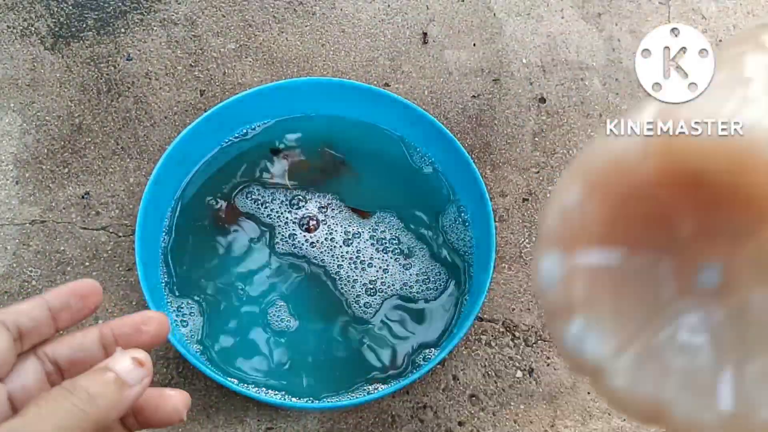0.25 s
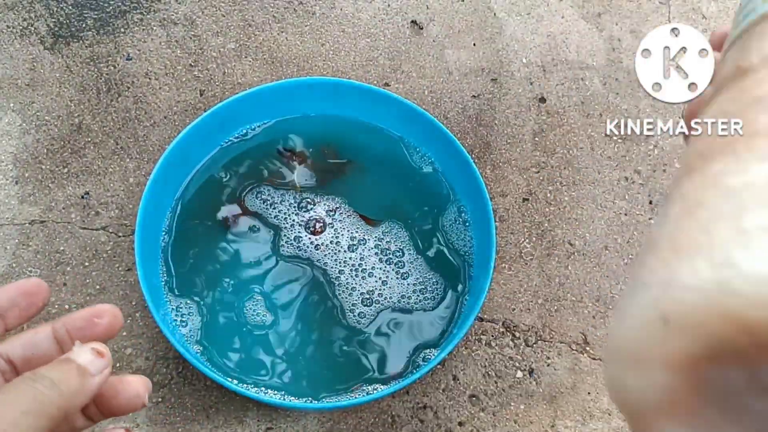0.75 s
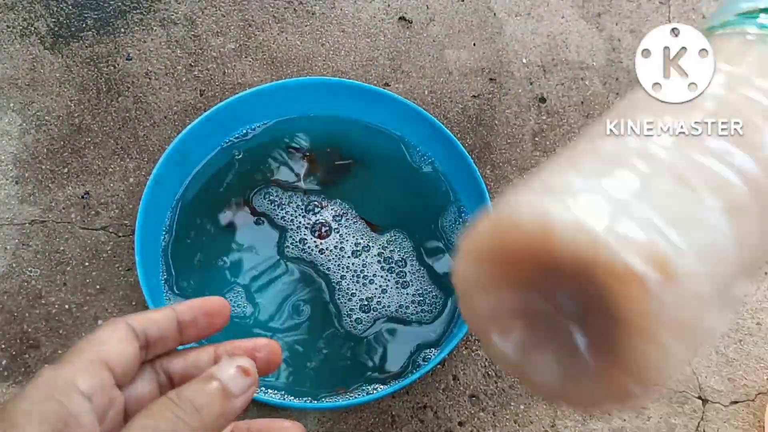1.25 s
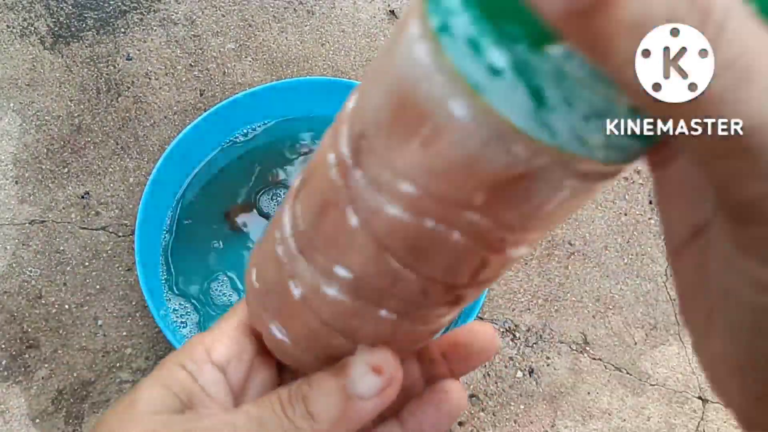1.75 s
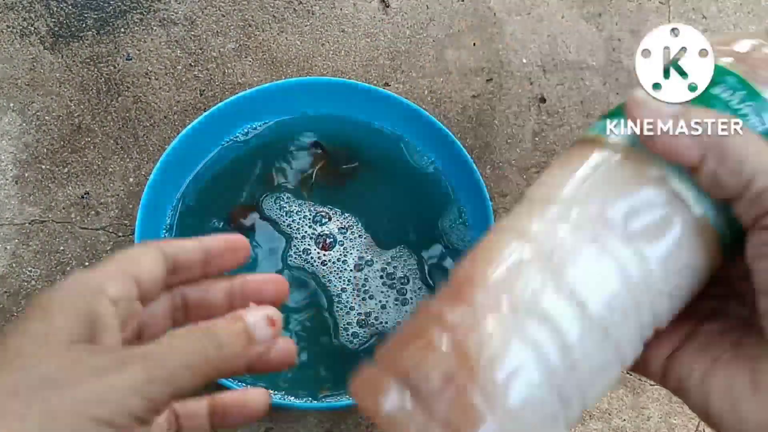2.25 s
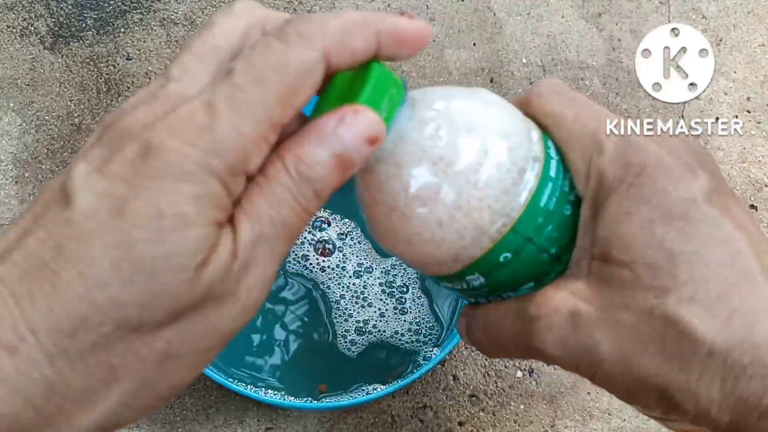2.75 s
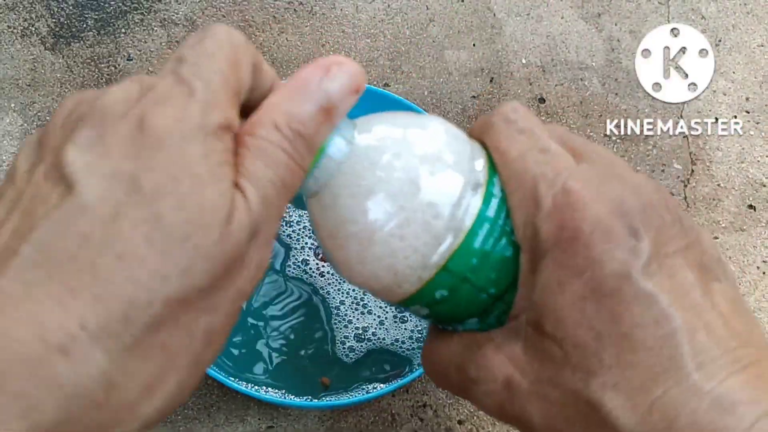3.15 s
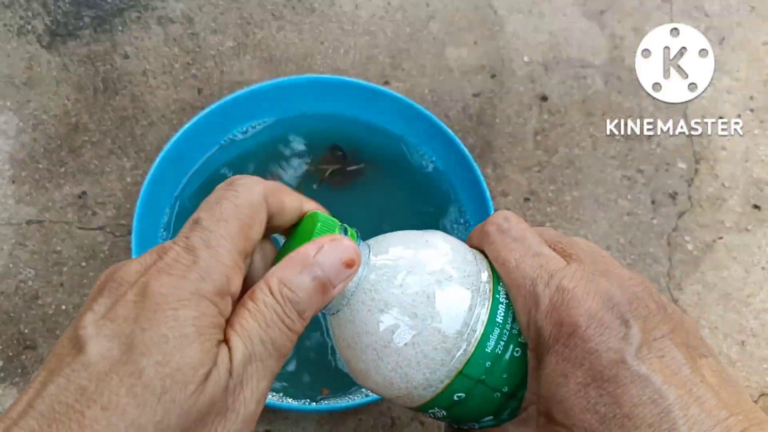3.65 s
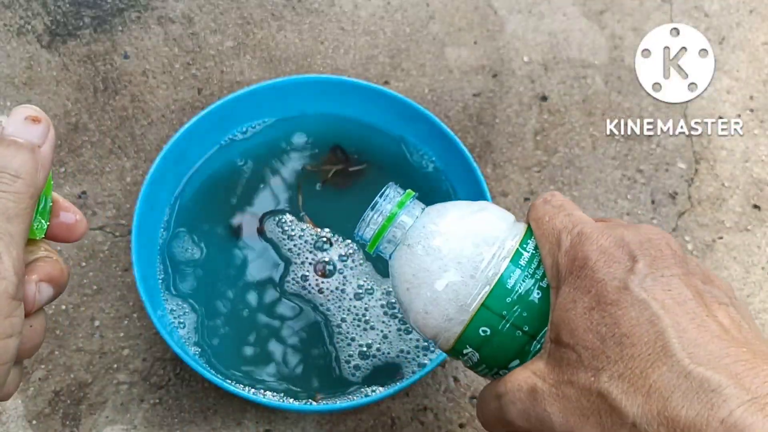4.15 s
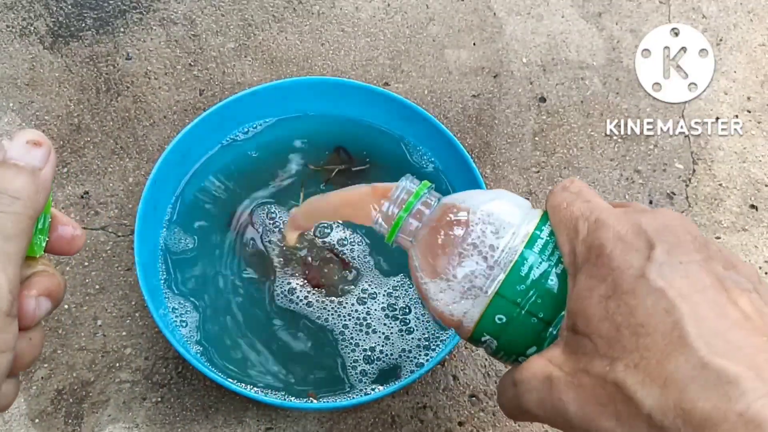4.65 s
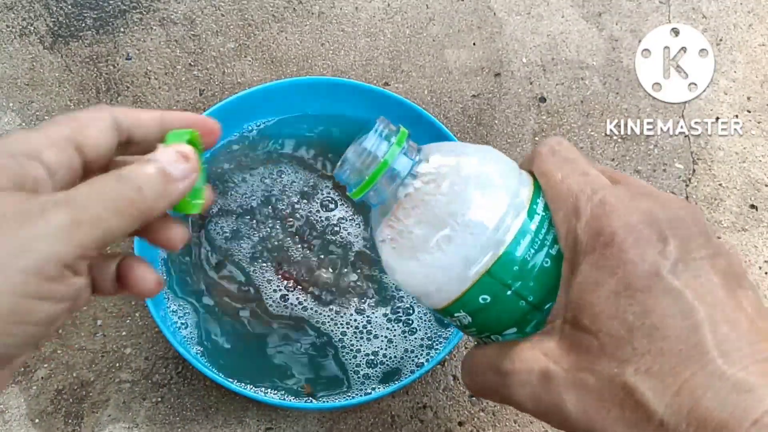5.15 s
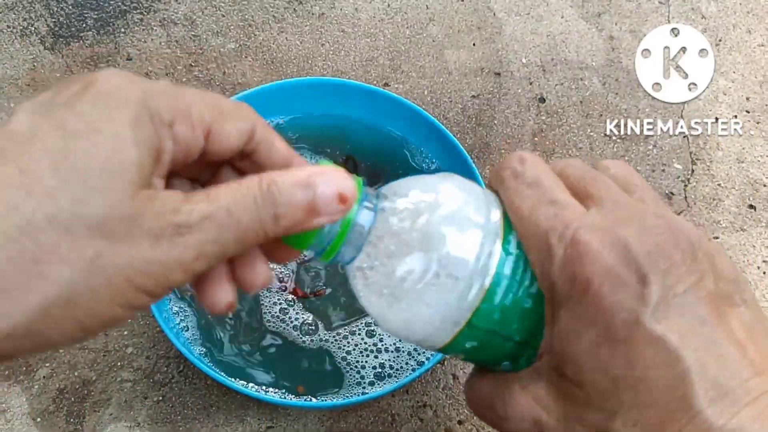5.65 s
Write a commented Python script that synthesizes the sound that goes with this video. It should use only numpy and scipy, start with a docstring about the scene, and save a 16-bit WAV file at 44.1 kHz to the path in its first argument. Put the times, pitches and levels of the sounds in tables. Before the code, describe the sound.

Outdoors in a yard, close to the microphone, soapy water is rocked in a thin plastic bottle. For the first two seconds foam swishes in uneven surges, with small gurgles and low gulps, and the bottle wall snaps loudly at about 0.6 seconds. From around 2.5 seconds the cap rubs softly on its thread, then cracks open sharply at 3.1 seconds with a short puff of air. Small ticks and scrapes follow, with low swings of liquid near 3.5 and 4.1 seconds, the second with a soft bump. From 4.3 to about 5 seconds a short stream dribbles into a basin of water, with bubbly plops and fine spray. Between 5.2 and 5.8 seconds the cap is turned and clicks back on, loudest near 5.5 seconds. A low far-off rumble and soft air continue throughout, with occasional faint bird whistles and chirps.

```python
"""Outdoors in a yard, close to a phone's two microphones, with a low far-off rumble and faint birds behind.
First a thin plastic bottle of soapy water is rocked: foam swishes, the liquid gulps, the wall snaps.
About three seconds in, the cap rubs on its thread and cracks open with a puff of trapped air.
A short stream then dribbles into a basin of water, driving in bubbles that ring as plops and spray.
Last, the cap is turned and clicks back on."""
import sys
import numpy as np
from scipy import signal
from scipy.fft import rfft, irfft
from scipy.io import wavfile
from scipy.ndimage import uniform_filter1d

SR = 44100
rng = np.random.default_rng(int(sys.argv[2]) if len(sys.argv) > 2 else 0)


def unload_wav(signal):
    """Save mono or channel-first audio to the path in sys.argv[1] as 16-bit WAV at rate SR, clipped to [-1, 1]."""
    wavfile.write(
        sys.argv[1],
        SR,
        np.round(np.clip(np.atleast_2d(signal).T, -1, 1) * 32767).astype(np.int16),
    )


N = 260631
TIME = np.arange(N) / SR

# Sound from all round the phone. Each row: frequency in Hz, correlation between the two microphones.
MIC_LIKENESS = [(60, .78), (300, .72), (640, .3), (1400, -.1), (3000, 0)]
# The microphone ports colour the treble differently; close sources take a share of this.
# Each row: frequency in Hz, left minus right in dB.
MIC_PORTS = [(200, 0.5), (1300, 4.5), (2500, -0.5), (4200, -3), (6200, -6.5), (8200, 10), (11000, -2.5),
             (15000, 3)]
# Humps of rumble, far off. Each row: centre in Hz, nominal width in Hz, level in dB.
RUMBLE_HUMPS = [(36.4, 39, -54.5), (57.3, 11, -53.5), (90, 130, -65), (123.1, 14, -63.5), (155.1, 7.9, -64)]
# Spectra of the open air, the foam, the swinging liquid, the cap's thread and the splash in the basin.
# Each row: frequency in Hz, relative spectral level in dB.
AIR_SPECTRUM = [(100, -33), (170, -6.5), (283, -13.5), (329, -14), (508, -14.5), (559, -16), (614, -21.5),
                (815, -23), (1210, -23.5), (1730, -26), (2130, -26), (4810, -32.5), (7560, -38),
                (15500, -39.5)]
FOAM_SPECTRUM = [(150, -30), (250, -7.5), (400, -14), (700, -14), (1250, -14), (1790, -8.5), (2760, -11),
                 (3900, -7.5), (5200, -11.5), (7300, -10.5), (9000, -17.5), (11600, -27.5), (15500, -31)]
GULP_SPECTRUM = [(30, 5), (70, 15), (130, 6.5), (300, -6.5), (500, -16), (1200, -45), (4000, -81.5)]
THREAD_SPECTRUM = [(300, -16), (1000, -8), (1600, -5), (2200, -5.5), (3200, -4.5), (5000, -15.5),
                   (7500, -18.5), (10000, -27.5), (15000, -37)]
SPLASH_SPECTRUM = [(350, -47), (600, -31), (716, -14), (993, -12.5), (1430, -19), (2070, -13),
                   (2720, -17.5), (3420, -12.5), (4560, -19.5), (4880, -16), (5660, -24), (6060, -19),
                   (7330, -17), (9500, -25.5), (12100, -41), (15500, -50)]
# Foam surging along the bottle wall. Each row: crest in seconds, length in seconds, relative level in dB.
FOAM_SURGES = [(.005, 0.033, -41), (.075, 0.094, -58.5), (.204, .014, -47), (.223, 0.055, -44),
               (.33, 0.062, -60), (.48, 0.14, -52.5), (.615, 0.084, -57), (.695, 0.085, -53),
               (.93, 0.11, -63), (1.028, 0.033, -60.5), (1.48, 0.16, -65), (1.626, 0.03, -57.5),
               (1.975, 0.16, -61.5), (2.108, 0.034, -55), (5.78, 0.1, -62.5)]
# Runs of larger bubbles, in the bottle and later under the stream.
# Each row: start in seconds, length in seconds, level in dB, centre pitch in Hz, spread in octaves.
GURGLE_RUNS = [(0.005, .12, -59, 1900, 1.2), (0.198, 0.065, -55, 380, 1.4), (.198, 0.069, -55, 1900, 1.2),
               (0.299, 0.077, -57.5, 550, 3.2), (4.44, .26, -56, 1500, 1.9),
               (4.819, 0.089, -58.5, 1800, .8)]
# The liquid swinging from end to end. Each row: crest in seconds, length in seconds, level in dB.
LIQUID_SWINGS = [(.25, 0.21, -58), (.68, 0.2, -52), (1.25, 0.1, -47.5), (3.54, 0.17, -46.5),
                 (4.08, 0.083, -48.5)]
# Gliding calls of distant birds. Each row: start in seconds, length in seconds, first pitch in Hz,
# last pitch in Hz, arch in Hz, amount of pitch blur, level in dB.
BIRD_CALLS = [(0.282, 0.14, 4150, 3740, -1, 0.028, -57), (1.54, 0.12, 4910, 5250, 201.5, .012, -67),
              (2.25, 0.2, 3950, 3500, 60, .024, -68.5), (2.413, 0.19, 3700, 5550, 700, 0.028, -66),
              (2.82, .19, 1259, 1165, 35, .011, -58.5), (5.009, 0.12, 1252, 1236, -5, .02, -65.5)]
# One bird repeating a short, rough chirp. Each row: start in seconds, level in dB.
BIRD_CHIRPS = [(2.507, -55), (2.754, -54.5), (3.013, -49)]
# A short gulp of the liquid, then soft knocks of bottle and hand. # Each row: start in seconds, level in dB,
# pitch in Hz, time to fade by 60 dB in seconds.
SOFT_BUMPS = [(.305, -40, 520, 0.014), (0.691, -34, 102, 0.095), (3.426, -43.5, 520, 0.079),
              (4.061, -33.5, 227, 0.036), (4.061, -31, 58, 0.11), (4.084, -34.5, 114.4, 0.11)]
# Snaps of the wall and clicks of the cap, close to the phone. Each row: start in seconds, level in dB,
# local ring in Hz, its level in dB, treble in dB, bass in dB, left minus right in dB.
WALL_SNAPS = [(0.6090, -15, 3800, -4, -2, 1.5, -4.5), (0.7948, -47.5, 3070, -1, 18, 0, -5),
              (1.029, -49, 3210, 9, 6, 1, 1)]
CAP_CLICKS = [(3.0812, -33.5, 2240, -14, -18.5, -5, -1.5), (3.1149, -12, 2130, 6.5, -1.5, -3, 0.5),
              (3.1212, -33, 2080, 0, -16, 7, 0), (3.174, -47.5, 2170, 0, -5, -7, -2),
              (3.274, -45, 3030, -2, -23, 4, 1), (3.511, -43, 1990, 7, -10.5, -2, 1),
              (3.526, -38, 2240, 11, -4.5, 17, -5.5), (3.531, -43, 2030, 16, -17, -3, -6),
              (5.1552, -38, 1520, -7.5, -23, 1, 0.5), (5.237, -45, 2170, -6, 1, 8, 6),
              (5.2485, -45, 2200, 5, -13, 12, -4), (5.2665, -50, 2310, -1, -10, 9, -1),
              (5.288, -49.5, 2280, -6, -13, 9, -10), (5.391, -44.5, 1780, -3, -22, 14, -8),
              (5.4717, -35.5, 1090, 3, -9, 3, -1), (5.4747, -21.5, 2370, -1, -13.5, 2.5, -2),
              (5.478, -24.5, 2280, 5, -4.5, 1, -5.5), (5.486, -37, 2850, 5, -5, 12, -2),
              (5.5933, -34.5, 2530, 4.5, -13.5, -5, -7.5), (5.7185, -38, 2060, 11, -35, 14.5, -0.5),
              (5.726, -47.5, 2500, 2, -20, 7, -1)]
# Modes of the wall, and of the cap and neck. Each row: centre in Hz, width in Hz, relative level in dB.
WALL_MODES = [(330, 300, -16), (757, 370, -14), (1650, 150, -5), (2286, 155, -1), (2580, 232, -4),
              (3700, 430, -1), (4140, 230, -3.5), (4550, 202, -5.5), (5800, 490, -13), (6600, 650, -12),
              (7750, 900, -9.5), (9900, 460, -15)]
NECK_MODES = [(330, 170, -11.5), (557, 120, -23), (1005, 140, -12.5), (1200, 220, -7.5), (1380, 109, -7),
              (1738, 198, -7), (2170, 200, -.5), (2410, 180, -7), (3404, 460, -6), (4300, 690, -11.5),
              (5450, 2400, -16.5), (6840, 1200, -9), (7800, 490, -14), (9800, 390, -21.5)]
# Turns of the cap on its thread. Each row: crest in seconds, length in seconds, level in dB.
CAP_TURNS = [(2.83, 0.97, -66.5), (3.174, 0.052, -56.5), (3.278, 0.064, -58), (3.308, 0.013, -56.5),
             (3.427, .025, -51), (3.465, 0.077, -59), (3.522, 0.036, -52.5), (5.212, 0.034, -58.5),
             (5.247, 0.042, -51), (5.39, 0.057, -61), (5.474, 0.086, -57), (5.728, 0.14, -57.5)]
# Air pockets driven into the basin, and single drops.
# Each row: start in seconds, relative level in dB, pitch in Hz, time to fade by 60 dB in seconds.
BASIN_PLOPS = [(4.2797, -33, 2310, 0.016), (4.28, -32, 3830, 0.013), (4.314, -32, 7960, 0.004),
               (4.3147, -45, 745, 0.025), (4.3273, -35.5, 3830, 0.017), (4.3655, -34, 960, 0.037),
               (4.391, -35.5, 2400, 0.011), (4.39, -36, 5040, 0.02), (4.4100, -36.5, 860, 0.032),
               (4.4315, -39, 3220, .014), (4.4632, -42.5, 2040, 0.016), (4.4694, -31.5, 1000, 0.042),
               (4.491, -33.5, 3420, 0.022), (4.5049, -33, 990, 0.016), (4.524, -41, 3400, 0.016),
               (4.525, -36.5, 980, 0.048), (4.529, -37, 3150, 0.028), (4.53, -37, 2100, .02),
               (4.5425, -41, 3000, .01), (4.545, -34, 5990, .004), (4.5502, -29, 5730, 0.0037),
               (4.5507, -38, 2320, 0.0054), (4.5533, -34, 8200, .004), (4.551, -32, 895, 0.014),
               (4.569, -42, 880, .016), (4.6225, -29, 930, 0.017), (4.6554, -31.5, 964, 0.023),
               (4.688, -41, 8300, 0.0082), (4.7215, -44, 3420, .017), (4.7821, -38, 923, 0.024),
               (4.7913, -37.5, 7330, 0.03), (4.826, -42, 3900, 0.007), (4.826, -41, 7400, 0.0097),
               (4.836, -41.5, 1160, 0.017), (4.862, -37.5, 7340, 0.01), (4.8653, -28, 728, 0.065),
               (4.883, -41, 7390, .01), (4.8882, -39, 3700, 0.007), (4.925, -42, 4200, .012)]

FLEX_HZ = (1500, 2800, 4300, 7200)  # bending waves linger in the plastic round these frequencies
POUR_START_S, POUR_FULLEST_S, POUR_END_S = 4.28, 4.576, 4.945
POUR_LENGTH_S = POUR_END_S - POUR_START_S


def undb(db):
    """Decibels to gain."""
    return 10 ** (np.asarray(db) / 20)


def unit(x):
    """Scale to rms 1."""
    return x / np.sqrt(np.mean(x ** 2) + 1e-20)


def fade(age, t60):
    """Decay that loses 60 dB in t60 seconds."""
    return np.exp(-np.log(1000) * age / t60)


def pan(db):
    """Microphone gains for a left minus right level difference."""
    return undb(np.array([[db], [-db]]) / 2)


def add(out, start_s, x):
    """Mix a sound in at a time."""
    i = max(int(start_s * SR), 0)
    out[:, i:i + x.shape[-1]] += x[..., :max(N - i, 0)]


def bins(size):
    """Frequencies of a spectrum in Hz."""
    return np.fft.rfftfreq(size, 1 / SR)


def over_hz(points, hz):
    """Read (Hz, value) points on a log-frequency axis."""
    f, value = np.transpose(points)
    return np.interp(np.log(hz + 1), np.log(f), value)


def colour(x, spectrum):
    """Give a sound a spectrum, at rms 1."""
    return unit(irfft(rfft(x) * undb(over_hz(spectrum, bins(N))), N))


def resonance(f, hz, width):
    """Complex response of one mode, gain 1 at its centre."""
    return 1j * f * width / (hz ** 2 - f ** 2 + 1j * f * width)


def resonate(x, hz, width, order=1):
    """Pass a sound through one mode, order times over, at rms 1."""
    size = x.shape[-1]
    return unit(irfft(rfft(x) * resonance(bins(size), hz, width) ** order, size))


def body(modes, f):
    """Gain of a set of modes, added by power."""
    return np.sqrt(sum(abs(undb(db) * resonance(f, hz, width)) ** 2 for hz, width, db in modes))


def sharp_response(gain):
    """The causal response with these gains whose energy arrives earliest, as in a hit."""
    cepstrum = irfft(np.log(gain + 1e-6))
    half = cepstrum.shape[-1] // 2
    fold = np.r_[1, np.full(half - 1, 2), 1, np.zeros(half - 1)]
    return irfft(np.exp(rfft(cepstrum * fold)))


def diffuse():
    """Noise from all round: alike on both microphones in the bass only."""
    mid, side = rfft(rng.standard_normal((2, N)))
    likeness = over_hz(MIC_LIKENESS, bins(N))
    return irfft(mid * np.sqrt(1 + likeness) + side * np.sqrt(1 - likeness) * np.array([[1], [-1]]), N)


def wander(per_s):
    """Smooth random drift at rms 1."""
    hold = max(int(SR / per_s), 2)
    steps = np.repeat(rng.standard_normal(N // hold + 1), hold)
    return unit(uniform_filter1d(steps, hold)[:N])


def crackle(per_s, spread_db):
    """Random tiny clicks of uneven size on two channels."""
    ticks = (rng.random((2, N)) < per_s / SR) * rng.choice([-1, 1], (2, N))
    return ticks * undb(spread_db * np.minimum(rng.exponential(size=(2, N)), 4))


def swells(rows, tail_db, tail_t60, rise_share=.3):
    """Gain of a series of movements: each rises quickly, falls more slowly and leaves a weaker tail."""
    power = np.zeros(N)
    for crest_s, length, db in rows:
        age = TIME - crest_s
        width_s = length * np.where(age < 0, rise_share, 1 - rise_share)
        hump = np.exp(-(age / width_s) ** 2)
        tail = (age > 0) * (1 - hump) * undb(tail_db) * fade(abs(age), tail_t60)
        power += (undb(db) * (hump + tail)) ** 2
    return np.sqrt(power)


def ring(hz, t60, glide, attack_s, lag_s):
    """A fading tone, lag_s later on the left; a positive glide is the rise of a bubble surfacing."""
    delays = np.array([[max(lag_s, 0)], [max(-lag_s, 0)]])
    t = np.maximum(np.arange(int((t60 + .003) * SR)) / SR - delays, 0)
    phase = 2 * np.pi * hz * (t + glide * t ** 2 / (2 * t60))
    return np.sin(phase) * fade(t, t60) * (1 - np.exp(-t / attack_s))


def mic_ports(x, share):
    """Colour a close sound differently at the two microphone ports."""
    return irfft(rfft(x) * pan(share) ** over_hz(MIC_PORTS, bins(N)), N)


def yard(x, t60, delay_s):
    """Scattered reflections from ground and walls, with the energy of the direct sound."""
    t = np.arange(SR // 2) / SR
    tail = rng.standard_normal((2, len(t))) * fade(t, t60) * (t > delay_s)
    return signal.fftconvolve(x, tail / np.sqrt(np.sum(tail ** 2) / 2), axes=1)[:, :N]


def outdoors(air_db=-60):
    """Far machines rumble under soft, slowly wandering air noise from all round."""
    f, noise = bins(N), rfft(diffuse())
    rumble = sum(undb(db) * unit(irfft(noise * abs(resonance(f, hz, .59 * width)) ** 2, N))
                 for hz, width, db in RUMBLE_HUMPS)
    return rumble + colour(diffuse(), AIR_SPECTRUM) * undb(air_db + .37 * wander(6.8))


def churn(x, flicker_db=2.7, size=256):
    """Pockets of froth open and close in hundredths of a second, so each band flickers on its own."""
    frames = signal.stft(x, nperseg=size)[2]
    patches = uniform_filter1d(rng.standard_normal(frames.shape[1:]), size=4, axis=0)
    patches = unit(uniform_filter1d(patches, size=4, axis=1))
    return unit(signal.istft(frames * undb(flicker_db * patches), nperseg=size)[1][:, :N])


def foam():
    """Soap films burst as the liquid slides; splashes tap the wall and ring the bottle's hollow."""
    films = colour(crackle(1700, spread_db=2), FOAM_SPECTRUM)
    hollow = resonate(crackle(280, spread_db=2.5), hz=2230, width=210)
    wall_ring = sharp_response(body(WALL_MODES, bins(4096)))
    taps = unit(signal.fftconvolve(crackle(200, spread_db=4.5), wall_ring[None], axes=1)[:, :N])
    large_films = resonate(crackle(200, spread_db=3.5), hz=6200, width=2200, order=2)
    grains = undb(-10) * hollow + undb(-8) * (taps + large_films)
    froth = churn(undb(1.4 * wander(110)) * films + grains)
    surges = swells(FOAM_SURGES, tail_db=-6, tail_t60=.67)  # the tail is foam running back down
    resting_fizz = resonate(crackle(1200, spread_db=3), hz=7640, width=1600, order=2)
    return mic_ports(undb(1.5) * froth * surges + undb(-79) * resting_fizz, share=.365) * pan(-2)


def gurgles(per_s=220, cycles=7, spread_db=10):
    """Air churns through the liquid; the bubbles crowd each other, so each rings only a few cycles."""
    out = np.zeros((2, N))
    for start_s, length, db, centre_hz, octaves in GURGLE_RUNS:
        run, count = np.zeros((2, N)), max(int(per_s * length), 1)
        for k, (when, pitch, strength, place) in enumerate(rng.random((count, 4))):
            hz = centre_hz * 2 ** (octaves * (pitch - .5))
            bubble = ring(hz, cycles / hz, glide=.15, attack_s=.0002, lag_s=.00067 * (place - .5))
            add(run, start_s + length * (k + when) / count, undb(spread_db * strength ** 2) * bubble)
        out += undb(db) * unit(run) * np.sqrt(length * SR / N)
    return out


def slosh():
    """The mass of liquid swings in the bottle with a low, wobbling gulp, then settles."""
    gulp = colour(diffuse(), GULP_SPECTRUM) * undb(2 * wander(40))
    return gulp * swells(LIQUID_SWINGS, tail_db=-6, tail_t60=.71)


def whistle(length, start_hz, end_hz, arch_hz, blur):
    """One gliding, arched note, loudest early on and blurred by distance, high notes most."""
    progress = np.linspace(0, 1, int(length * SR))
    bow = np.sin(np.pi * progress).clip(0)
    jitter = blur * start_hz / 2000 * wander(600)[:2 * len(progress)].reshape(2, -1)
    hz = (start_hz + (end_hz - start_hz) * progress + arch_hz * bow) * (1 + jitter)
    return np.sqrt(2 * bow * (1 - progress)) * np.sin(2 * np.pi * np.cumsum(hz, axis=1) / SR)


def birds():
    """Thin whistles and rough chirps from far off, scattered by the yard."""
    out = np.zeros((2, N))
    for start_s, length, start_hz, end_hz, arch_hz, blur, db in BIRD_CALLS:
        add(out, start_s, undb(db) * whistle(length, start_hz, end_hz, arch_hz, blur))
    for start_s, db in BIRD_CHIRPS:
        add(out, start_s, undb(db) * whistle(.016, start_hz=2790, end_hz=3157, arch_hz=0, blur=.022))
    return (out + yard(out, t60=.14, delay_s=.00047)) / np.sqrt(2)


def bumps():
    """A short gulp of the liquid and soft, quickly damped knocks of bottle and hand, alike on both microphones."""
    out = np.zeros((2, N))
    for start_s, db, hz, t60 in SOFT_BUMPS:
        add(out, start_s, undb(db) * ring(hz, t60, glide=0, attack_s=.0022, lag_s=0))
    return out


def plastic_clicks(rows, modes, scatter, scatter_s, ring_q, crack_db, lag_s=.00008, size=4096):
    """Thin plastic gives way: a jolt and a scatter of creases drive its modes and one local ring."""
    out, f, t = np.zeros((2, N)), bins(size), np.arange(size) / SR
    ports = pan(1) ** over_hz(MIC_PORTS, f) * undb(over_hz([(8800, 4), (11500, -11.5)], f))
    late_right = np.exp(-2j * np.pi * f * np.array([[0], [lag_s]]))
    fine = f / (f + 1500)  # the creases are tiny and hardly move the low modes
    # all-pass: the flexing shell spreads the jolt out without colouring it
    flex = np.prod([1 - 2 * resonance(f, hz, .32 * hz) for hz in FLEX_HZ], axis=0)
    crease_envelope = scatter * np.exp(-t / scatter_s) * np.minimum(t / .0012, 1)
    for start_s, db, ring_hz, ring_db, treble_db, bass_db, pan_db in rows:
        drive = 1 + fine * rfft(rng.standard_normal((2, size)) * crease_envelope)
        tilt = undb(over_hz([(600, bass_db), (1800, .0024), (2700, 0), (6000, treble_db)], f))
        gain = body(modes + [(5500, 6000, crack_db), (ring_hz, ring_hz / ring_q, ring_db)], f)
        shell = rfft(sharp_response(gain * tilt * ports))
        click = irfft(drive * shell * flex * late_right)[:, :size // 2]
        click /= np.sqrt(np.sum(click ** 2) / (2 * .0024 * SR))  # the energy of 2.4 ms at rms 1
        add(out, start_s, click * undb(db) * pan(pan_db))
    return out


def wall_snaps():
    """The bottle's thin wall snaps as it is rocked, close to the phone."""
    return plastic_clicks(WALL_SNAPS, WALL_MODES, scatter=.16, scatter_s=.0023, ring_q=9.6, crack_db=-18)


def cap_thread():
    """The cap sticks and slips on its thread; now and then a larger slip ticks in the neck."""
    rub = colour(crackle(1300, spread_db=3), THREAD_SPECTRUM) * undb(2 * wander(65))
    slips = resonate(crackle(110, spread_db=2.5), hz=2200, width=700)
    turns = swells(CAP_TURNS, tail_db=-24, tail_t60=.33)  # the fingers rub on as they let go
    return (rub + undb(-7) * slips) * turns


def cap_clicks():
    """The cap cracks open and later clicks back on, ringing the neck."""
    return plastic_clicks(CAP_CLICKS, NECK_MODES, scatter=.26, scatter_s=.0017, ring_q=6.9, crack_db=-30)


def air_puff(start_s=3.117, db=-41.5, t60=.125):
    """Trapped air hisses out as the seal lets go."""
    age = np.maximum(TIME - start_s, 0)
    return colour(diffuse(), FOAM_SPECTRUM) * undb(db) * (age > 0) * fade(age, t60)


def plops(centre_hz=980, slap_s=.0039):
    """Air pockets ring in the basin, each with a wet slap; the smaller, the further left it is heard."""
    out, t = np.zeros((2, N)), np.arange(SR // 20) / SR
    for start_s, db, hz, t60 in BASIN_PLOPS:
        octaves = np.log2(hz / centre_hz)
        bubble = ring(hz, t60, glide=.044, attack_s=.00068, lag_s=.0001)
        add(out, start_s, undb(db - .5) * pan(2 * octaves) * bubble)
        # the smaller the drop, the higher and weaker its slap
        slap = resonate(rng.standard_normal((2, len(t))), hz=1.022 * hz, width=.55 * hz, order=2)
        add(out, start_s, undb(db - 6 - 2.6 * octaves) * slap * np.exp(-t / slap_s))
    return out


def flow(peak_db=-52.5, swell_db_per_s=11.5, sag_db_per_s=19, attack_s=.016, release_s=.013):
    """Gain of the stream: it starts abruptly, swells, slackens and is cut off as the bottle tips back."""
    onset = np.clip((TIME - POUR_START_S) / attack_s, 0, 1)
    cutoff = np.clip((POUR_END_S - TIME) / release_s, 0, 1)
    age = TIME - POUR_FULLEST_S
    return onset * cutoff * undb(peak_db + np.minimum(swell_db_per_s * age, -sag_db_per_s * age))


def splash(count=600, spread_db=13):
    """The stream hits the water and throws a spray of small, briefly ringing bubbles over a fine wash."""
    spray = np.zeros((2, N))
    for k, (when, pitch, sustain, strength, place) in enumerate(rng.random((count, 5))):
        hz = 800 * 12 ** pitch
        t60 = .003 + (6 + 24 * sustain) / hz
        bubble = ring(hz, t60, glide=.053, attack_s=.00011, lag_s=.00045 * (place - .5))
        start_s = POUR_START_S + POUR_LENGTH_S * (k + when) / count
        add(spray, start_s, undb(spread_db * strength ** 3) * np.sqrt(hz) * bubble)
    spray = colour(spray, SPLASH_SPECTRUM) * np.sqrt(POUR_LENGTH_S * SR / N)  # rms 1 during the pour
    wash = colour(crackle(2700, spread_db=4), SPLASH_SPECTRUM)
    return flow() * mic_ports(undb(-3) * spray + undb(-9) * wash, share=.71)


def suds(count=40, faintest_db=-56, spread_db=12):
    """Soap films on the basin burst in tiny high ticks, to the left, while the stream disturbs them."""
    out = np.zeros((2, N))
    for k, (when, pitch, strength, sustain) in enumerate(rng.random((count, 4))):
        hz, t60 = 6400 + 2200 * pitch, .005 + .013 * sustain
        tick = ring(hz, t60, glide=-.06, attack_s=.00008, lag_s=.00005)
        start_s = POUR_START_S + POUR_LENGTH_S * (k + when) / count
        add(out, start_s, tick * undb(faintest_db + spread_db * strength ** 3) * pan(8))
    return out


def scene():
    """Bottle and basin close to the phone, a little of the yard round them, birds and rumble far off."""
    bottle = wall_snaps() + cap_clicks() + air_puff() + foam() + cap_thread()
    near = bottle + plops() + splash() + gurgles() + suds()
    reflections = undb(-18.5) * yard(near, t60=.1, delay_s=.0039)
    return near + reflections + slosh() + bumps() + birds() + outdoors()


def record(dry):
    """The phone cuts the treble above 15.8 kHz."""
    return signal.sosfilt(signal.ellip(8, .2, 70, 15800, fs=SR, output="sos"), dry)


dry = scene()
out = record(dry)
unload_wav(out)
```